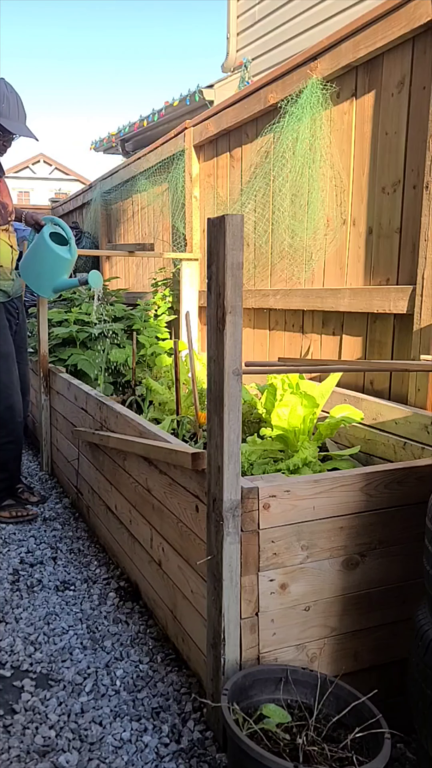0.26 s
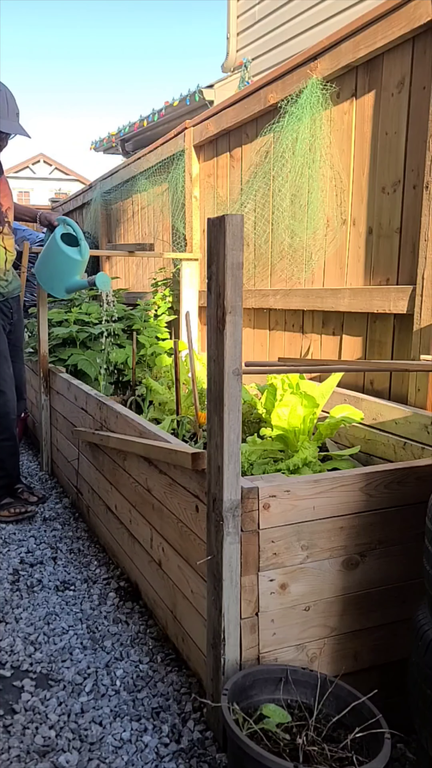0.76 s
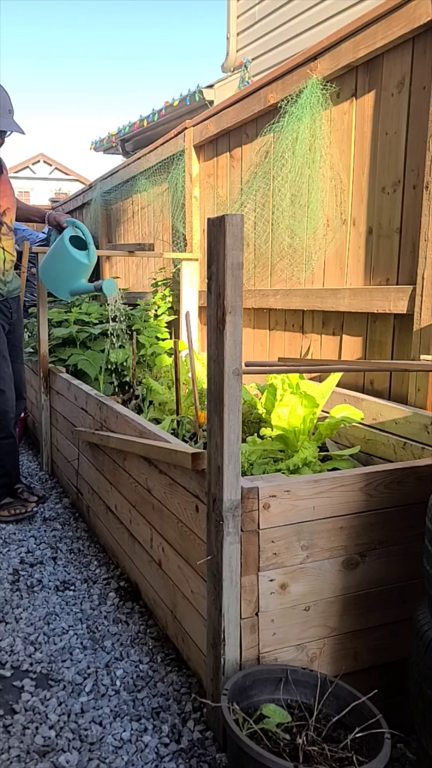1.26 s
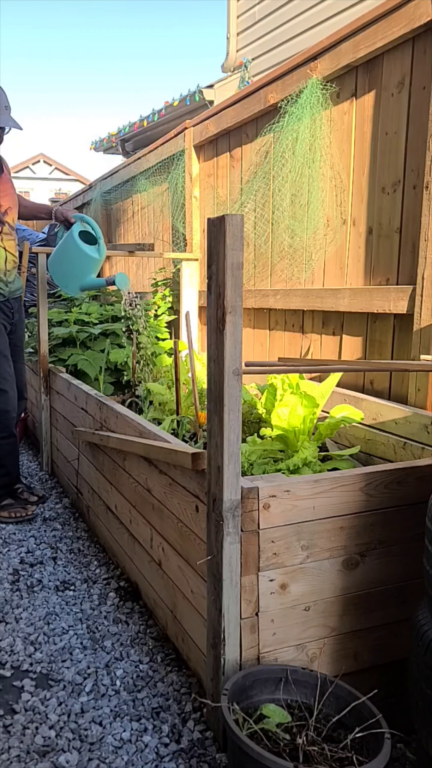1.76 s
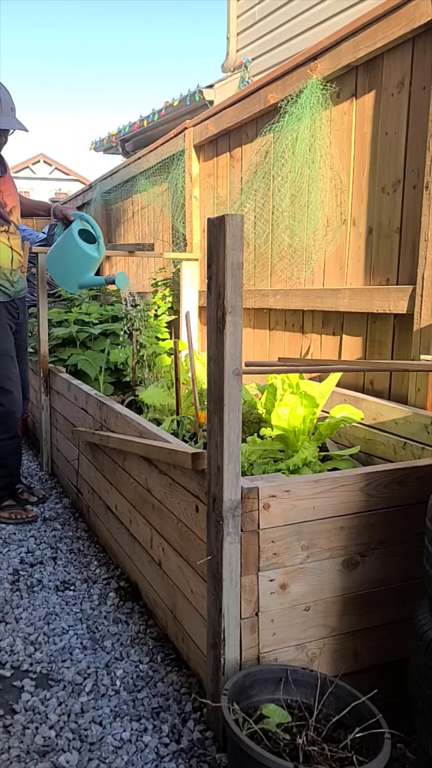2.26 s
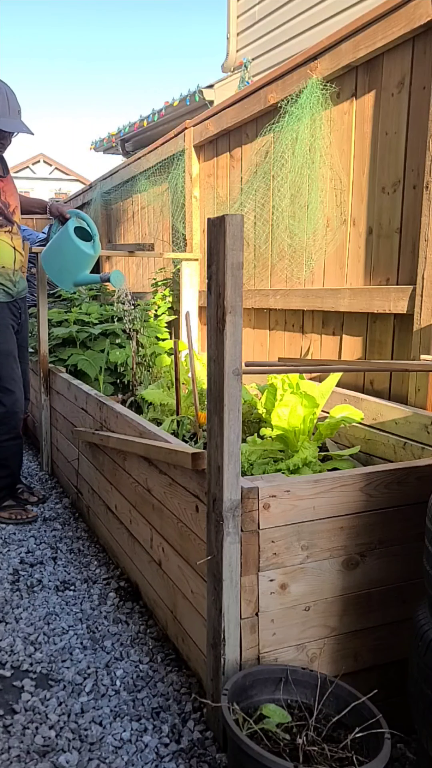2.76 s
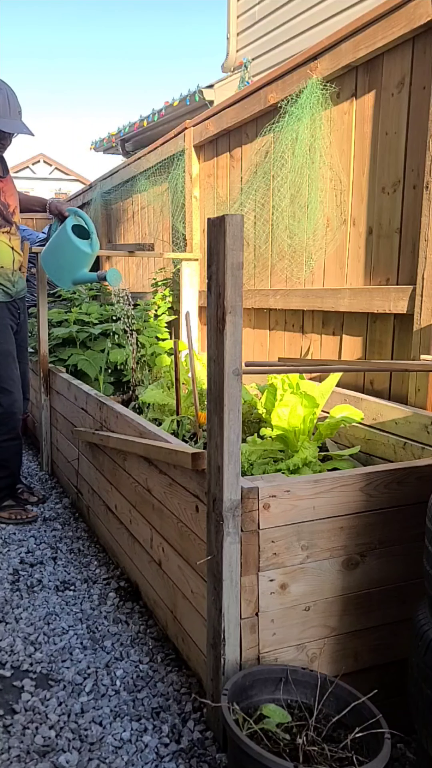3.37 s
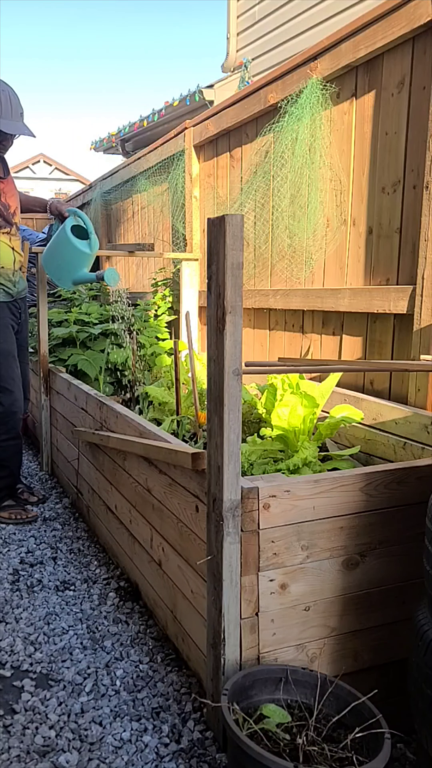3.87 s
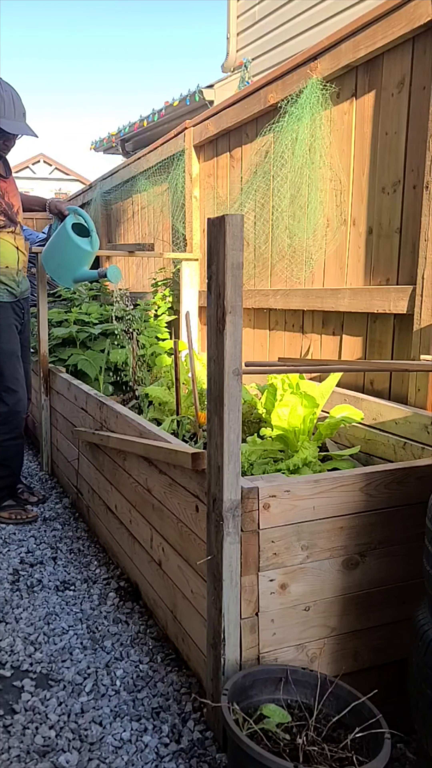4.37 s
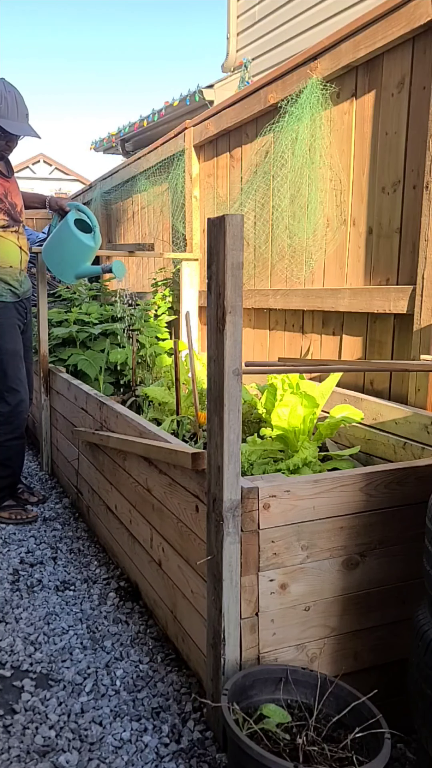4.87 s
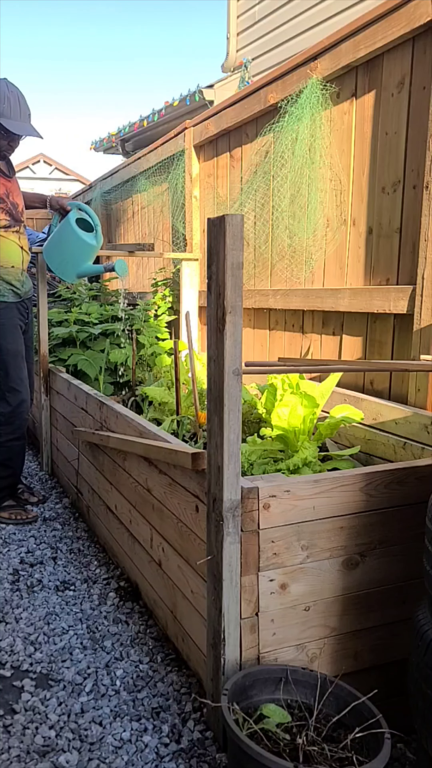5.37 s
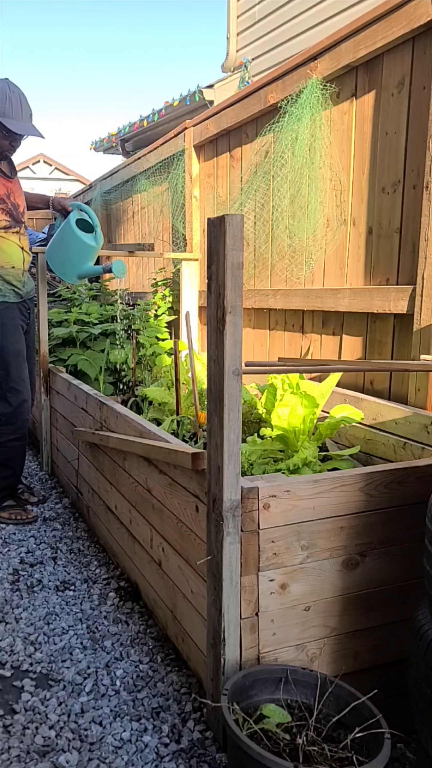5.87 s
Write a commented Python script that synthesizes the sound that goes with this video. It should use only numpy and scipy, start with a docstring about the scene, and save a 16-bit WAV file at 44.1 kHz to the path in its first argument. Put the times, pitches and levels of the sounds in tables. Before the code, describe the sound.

A watering can sprinkles leafy plants in a raised wooden bed outdoors. Fine, bright patter and soft soil splashing continue throughout, swaying between leaves and earth. Fat drops plop at irregular moments with brief bubbly rings, and some smack leaves into fizzy spray. Distant traffic rumbles low behind with a faint engine drone. Stereo microphones sit a few metres away, catching short reflections from boards and fence.

```python
"""Fat drops plop on leaves and wet soil and burst into spray, over a fine patter and the splash of a stream.
A watering can sways over leafy plants in a raised wooden bed, a few metres from two microphones.
Each drop is a short pulse at its own pitch, scattered by bed, gravel and fence; random small drops make
the patter, fizz and splash. Behind, distant traffic of shaped noise with a low hum and an engine drone
rumbles, and one thin whistle passes."""
import sys
import numpy as np
from scipy import signal
from scipy.fft import rfft, irfft
from scipy.io import wavfile

SR = 44100
rng = np.random.default_rng(int(sys.argv[2]) if len(sys.argv) > 2 else 0)


def bounce(signal):
    """Save signal as a 16-bit WAV file at the path given by the first command-line argument."""
    frames = np.transpose(np.atleast_2d(signal))
    limited = np.clip(frames, -1, 1)
    pcm = np.round(limited * 32767).astype(np.int16)
    wavfile.write(sys.argv[1], SR, pcm)


N = 269892
TIME = np.arange(N) / SR  # s
RING = 12288  # samples that one drop and its echoes last

# Every table level is the level ahead of the layer offsets, path and microphone colour in the functions.

# Distant traffic: (time [s], deep rumble level [dB], tyre roar level [dB])
TRAFFIC_LEVELS = [(0, -40.5, -55.5), (.7, -40.5, -57.5), (1.7, -39, -58), (4.25, -38.5, -58),
                  (4.8, -41, -58), (6.12, -39, -57.5)]
# Drone of a far engine: (time [s], pitch [Hz], level [dB])
ENGINE_DRONE = [(0, 312.4, -53), (.3, 314.2, -55), (.45, 329.5, -63.5), (2.1, 330, -61), (3, 322, -77),
                (6.12, 327.6, -63)]
# Spectra of the deep rumble, the engine murmur and the tyre roar: (frequency [Hz], density [dB per Hz])
RUMBLE_SPECTRUM = [(14, -58), (22, -41), (30, -2), (38, -2), (46, -2), (58, -1), (80, -3), (108, -13),
                   (132, -8.5), (165, -13), (215, -25.5), (400, -43.5), (1000, -100)]
MURMUR_SPECTRUM = [(90, -17), (190, 0), (218, -3), (243, 0), (288, -2.5), (318, -3), (350, -9.5),
                   (480, -19.5), (700, -29), (1200, -87)]
ROAD_SPECTRUM = [(300, -11), (520, -7.5), (640, -8.5), (720, -5), (830, -3.5), (980, 1.5), (1130, 0),
                 (1400, -6), (2000, -15.5), (3000, -19), (8000, -28)]
# Likeness of the traffic at the two microphones: (frequency [Hz], likeness [0-1])
MIC_LIKENESS = [(30, .95), (250, .94), (400, .8), (650, .4), (1100, .5), (1600, .25), (3000, .1)]
# How far the left microphone leads on the traffic: (frequency [Hz], phase [rad])
LEFT_LEAD = [(30, 0), (400, 0.22), (700, 0.97), (1150, 1.51), (1700, 0.033), (2200, 1.36)]
# Colour difference of the microphones: (frequency [Hz], left minus right [dB])
MIC_TILT = [(30, 0.2), (400, 0), (1000, 2.5), (1300, 1), (1750, 4), (2500, 0.5), (3300, 0), (4200, -4.5),
            (5600, -1), (7300, -5), (8200, 0), (10500, -1.5), (11500, -4.5), (15500, -2)]
# Pitches that echoes between boards and fence strengthen or weaken:
# (frequency [Hz], width [Hz], lift [dB])
BOARD_ECHOES = [(1680, 35, 0.5), (2040, 55, 5), (2600, 57, -5), (3090, 65, 6), (3290, 140, 3.5),
                (3760, 190, 0), (4200, 140, -1.5), (4540, 47, -10), (5480, 360, 2), (6180, 220, 4),
                (6550, 190, 5), (7300, 690, 6)]
# Where the swaying can is aimed: (time [s], aim [0 = bare soil, 1 = leaves])
CAN_AIM = [(0, 0.41), (.3, 0.27), (.9, 0.41), (1.35, .7), (1.62, 0.59), (1.9, 0.13), (2.3, 0.052),
           (2.75, 0.52), (3.35, 0.32), (3.85, .35), (4.15, 0.88), (4.8, .45), (5.2, 0.87), (5.7, 0.49),
           (6.12, .85)]
# Spectra of the patter on leaves, the spray and the splash on soil: (frequency [Hz], density [dB per Hz])
PATTER_SPECTRUM = [(1500, -14), (2400, -1), (3200, -3.5), (4300, 6), (5500, 0.5), (7300, -1), (8300, 4),
                   (15000, -38)]
SPRAY_SPECTRUM = [(1500, -15), (3500, -7), (7300, -8), (8400, -6), (10300, -4), (11600, -0.5),
                  (14500, -0.5), (16000, -4.5)]
SOIL_SPECTRUM = [(600, -3), (1200, -19.5), (1750, -1.5), (2400, -17), (3500, 10.5), (8000, -33)]
# Water that smacks flat on a leaf and bursts into spray: (time [s], level over the first 20 ms [dB])
LEAF_SMACKS = [(0.181, -56.5), (0.374, -51.5), (0.5811, -49), (0.646, -53), (1.0565, -59), (1.2451, -53),
               (1.4235, -55), (2.2842, -55.5), (2.7462, -52.5), (3.708, -54), (3.9769, -54), (4.572, -55),
               (4.9776, -50.5), (5.2342, -53), (5.312, -49), (5.4904, -51.5), (5.952, -53.5)]
# Fat drops that plop into the wet bed:
# (time [s], level over the first 20 ms [dB], pitch [Hz], bandwidth [octaves])
FAT_DROPS = [(0.017, -56, 5420, 0.16), (0.064, -53.5, 4100, 0.22), (0.3002, -56, 4470, 0.23),
             (0.4673, -46, 3410, 0.28), (0.5811, -54, 4000, 0.15), (0.6455, -49, 1884, 0.22),
             (0.983, -53, 3480, 0.68), (1.0565, -54, 4350, 0.28), (1.3114, -55, 4140, 0.17),
             (1.4247, -48, 4470, 0.54), (1.675, -55.5, 3940, 0.34), (1.736, -43.5, 2150, 0.38),
             (1.7644, -47, 4120, 0.2), (2.5262, -53.5, 4230, 0.53), (2.83, -49.5, 5340, 1),
             (2.979, -53.5, 1830, 0.23), (3.1206, -49, 3490, 0.15), (3.274, -53.5, 2490, 0.6),
             (3.5551, -52, 3700, 0.22), (3.5735, -53, 4240, 0.15), (4.134, -53, 3840, 0.31),
             (4.4239, -52, 3830, 0.3), (4.4798, -57, 3440, 0.29), (4.591, -55, 3450, 0.37),
             (4.7027, -53.5, 3020, 0.33), (5.176, -54, 3650, 0.094), (5.234, -48.5, 3970, 0.28),
             (5.5348, -49.5, 3230, 0.23), (5.6253, -52.5, 3100, 0.4), (5.7758, -48.5, 4115, 0.42),
             (5.8306, -49.5, 3850, 0.15), (5.9068, -46, 3340, 0.22), (5.918, -45.5, 4320, 0.18),
             (5.9515, -51, 2900, 0.38), (6.023, -47.5, 3870, 0.17), (6.073, -52.5, 3080, 0.28)]

# a thin, faint whistle that rises slightly
WHISTLE_S, WHISTLE_LENGTH_S, WHISTLE_DB = 4.6, 0.21, -72
WHISTLE_HZ, WHISTLE_RISE_HZ_PER_S = 8090, 500
# layer levels with the can aimed at soil, and the change on turning to the leaves
PATTER_DB, PATTER_SWING_DB = -67.5, 11
SPRAY_DB, SPRAY_SWING_DB = -68.5, 10
SOIL_DB, SOIL_SWING_DB = -58.5, -7
START_DB, START_S = -8, 1.4  # the splash on the soil builds up as the pour gets going
DROP_SPRAY_DB = -64  # the little spray that every plop throws up
EDGE_HZ = 15850  # upper band limit


def gain_of(db):
    """Decibels to gain."""
    return 10 ** (np.asarray(db) / 20)


def evened(x):
    """Scales to rms 1."""
    return x / np.sqrt(np.mean(x ** 2) + 1e-20)


def read(points, size):
    """A table over frequency, read on a log scale at the bins of a transform."""
    hz, value = np.transpose(points)
    bins_hz = np.fft.rfftfreq(size, 1 / SR)
    return np.interp(np.log(bins_hz + 1), np.log(hz), value)


def follow(rows):
    """The columns of a table over time, at every sample."""
    s, *columns = np.transpose(rows)
    return [np.interp(TIME, s, column) for column in columns]


def colour(x, points):
    """Gives x a spectrum, at rms 1."""
    return evened(irfft(rfft(x) * gain_of(read(points, N)), N))


def wander(per_s):
    """Slow chance of rms 1: noise kept below about per_s Hz."""
    hz = np.fft.rfftfreq(N, 1 / SR)
    slow = rfft(rng.standard_normal(N)) / (1 + (hz / per_s) ** 4)
    return evened(irfft(slow, N))


def add(mix, s, sound):
    """Mixes a sound in at time s."""
    part = mix[:, max(round(s * SR), 0):][:, :sound.shape[1]]
    part += sound[:, :part.shape[1]]


def distant_noise():
    """Noise from far away: alike at both microphones in the bass, less so higher up."""
    left, other = rfft(rng.standard_normal((2, N)))
    same = np.clip(read(MIC_LIKENESS, N), 0, 1)
    right = same * left + np.sqrt(1 - same ** 2) * other
    right = right * np.exp(-1j * read(LEFT_LEAD, N))
    return irfft(np.array([left, right]), N)


def tone(hz, db, waver_hz):
    """A sine of given rms level whose pitch wavers around hz."""
    turns = np.cumsum(hz + waver_hz * wander(per_s=8.0)) / SR
    return gain_of(db) * np.sqrt(2) * np.sin(2 * np.pi * turns)


def traffic(murmur_db=5.0, road_db=3.5, hum_hz=58, hum_db=-50):
    """Lumpy deep rumble with a low hum, murmur and drone of engines, and tyre roar swaying in the air."""
    deep, tyres = follow(TRAFFIC_LEVELS)
    rumble_level = deep + 1.0 * wander(per_s=8.6)
    murmur_level = tyres + murmur_db + 0.91 * wander(per_s=7.5)
    road_level = tyres + road_db + 0.71 * wander(per_s=10.0)
    rumble = gain_of(rumble_level) * colour(distant_noise(), RUMBLE_SPECTRUM)
    murmur = gain_of(murmur_level) * colour(distant_noise(), MURMUR_SPECTRUM)
    road = gain_of(road_level) * colour(distant_noise(), ROAD_SPECTRUM)
    hum_turns = np.cumsum(hum_hz + 1.39 * wander(per_s=3.05)) / SR
    hum = gain_of(hum_db) * evened(np.sin(2 * np.pi * hum_turns))
    drone = tone(*follow(ENGINE_DRONE), waver_hz=2.61)
    return rumble + murmur + road + hum + drone


def whistle():
    """One brief, thin note high above the water: a wavering, rising sine that swells and fades."""
    t = np.clip(TIME - WHISTLE_S, 0, WHISTLE_LENGTH_S)
    swell = np.sin(np.pi * t / WHISTLE_LENGTH_S)
    return swell * tone(WHISTLE_HZ + WHISTLE_RISE_HZ_PER_S * t, WHISTLE_DB, waver_hz=22)


def click(db):
    """Spectrum of the shortest causal pulse with this colour (minimum phase), peaking near gain 1."""
    log_gain = np.log(gain_of(db - db.max()) + 1e-4)
    circle = np.concatenate([log_gain, log_gain[-2:0:-1]])
    return np.exp(np.conj(signal.hilbert(circle)))[:len(db)]


def boards(water, between_db=-0.56):
    """The fixed colour of the path from bed to microphones: boards and fence favour some pitches."""
    f = np.fft.rfftfreq(RING, 1 / SR)
    db = between_db + sum(lift / (1 + (2 * (f - hz) / width) ** 4) for hz, width, lift in BOARD_ECHOES)
    path = irfft(click(db), RING) * gain_of(db.max())
    return signal.oaconvolve(water, path[None], axes=1)[:, :N]


def garden(pulse, scatter_t60, build_s, tail_t60=0.33, tail_db=-9, direct=0.69):
    """One spot of the bed at each microphone: direct sound, scatter off leaves and boards, fence tail."""
    t = np.arange(RING) / SR
    taps = rng.standard_normal((2, RING)) * (rng.random((2, RING)) < .12)  # sparse echoes
    scatter = gain_of(-60 * t / scatter_t60)
    tail = gain_of(tail_db - 60 * t / tail_t60)
    taps *= (1 - np.exp(-t / build_s)) * (scatter + tail)
    taps[:, 0] = direct
    sound = irfft(rfft(taps) * pulse, RING)
    return sound / np.sqrt(np.mean(sound[:, :SR // 50] ** 2))  # rms 1 over the first 20 ms


def plop(hz, octaves):
    """A drop's impact: a few cycles around one pitch, more of them the narrower the band."""
    away = np.log2((np.fft.rfftfreq(RING, 1 / SR) + 1) / hz) / octaves
    return click(-30 * np.log10(1 + away ** 2 / 5))


def shower(per_s, spread_db, lo_hz, hi_hz, octaves, count=16):
    """Small drops of random size tick on many spots, each spot with its own pitch."""
    out = np.zeros((2, N))
    for hz in np.geomspace(lo_hz, hi_hz, count):
        sound = garden(plop(hz, octaves), scatter_t60=.05, build_s=.0006, tail_db=-14, direct=1.5)
        chance, when, size = rng.random((3, 600))
        lands = chance < per_s * (N / SR) / (count * len(chance))  # per_s is shared by all spots
        for s, u in zip(when[lands] * N / SR, size[lands]):
            add(out, s, gain_of(-spread_db * np.log(u + 0.14)) * sound)
    return evened(out)


def drips(db, spray_db, lo_hz, hi_hz, octaves, count=32):
    """Middling drops run off the leaves at uneven intervals, each with its own pitch and some spray."""
    out = np.zeros((2, N))
    burst = click(read(SPRAY_SPECTRUM, RING))
    for k, (when, pitch) in enumerate(rng.random((count, 2))):
        s = (k + when) / count * N / SR
        hz = lo_hz * (hi_hz / lo_hz) ** pitch
        add(out, s, gain_of(db) * garden(plop(hz, octaves), scatter_t60=0.09, build_s=0.00086))
        add(out, s, gain_of(spray_db) * garden(burst, scatter_t60=.12, build_s=0.00076))
    return out


def pour(patter_db=-2.0, bubble_db=-3.5, mist_db=-5):
    """Patter, bubbles, drips and fizzing mist grow as the can turns to leaves; the soil splash recedes."""
    aim, = follow(CAN_AIM)
    leaves = PATTER_DB + PATTER_SWING_DB * aim
    spray = SPRAY_DB + SPRAY_SWING_DB * aim
    soil = SOIL_DB + SOIL_SWING_DB * aim + START_DB * np.maximum(1 - TIME / START_S, 0)
    ticks = shower(per_s=190, spread_db=4.0, lo_hz=2520, hi_hz=7100, octaves=0.13, count=24)
    rings = shower(per_s=130, spread_db=3.3, lo_hz=2200, hi_hz=7000, octaves=.025, count=40)
    specks = shower(per_s=300, spread_db=3.8, lo_hz=6500, hi_hz=15000, octaves=.25)
    slaps = shower(per_s=700, spread_db=2.5, lo_hz=1120, hi_hz=2633, octaves=0.062, count=24)
    patter = gain_of(patter_db) * colour(ticks, PATTER_SPECTRUM)
    bubbles = gain_of(bubble_db) * colour(rings, PATTER_SPECTRUM)
    fizz = colour(specks, SPRAY_SPECTRUM)
    mist = gain_of(mist_db) * colour(rng.standard_normal((2, N)), SPRAY_SPECTRUM)
    splash = colour(slaps, SOIL_SPECTRUM)
    run_off = drips(db=3.5, spray_db=0.5, lo_hz=3300, hi_hz=6700, octaves=.2)
    clumps_db = 1.7 * wander(per_s=20)  # the stream breaks into clumps as it falls
    return (gain_of(leaves + clumps_db) * (patter + bubbles)
            + gain_of(leaves) * run_off
            + gain_of(spray + clumps_db) * (fizz + mist)
            + gain_of(soil) * splash)


def sprays():
    """Bursts of bright spray, each a scattered pulse: from a smack on a leaf, and slight from a plop."""
    out = np.zeros((2, N))
    burst = click(read(SPRAY_SPECTRUM, RING))
    from_plops = [(drop[0], DROP_SPRAY_DB) for drop in FAT_DROPS]
    for s, db in list(LEAF_SMACKS) + from_plops:
        add(out, s, gain_of(db) * garden(burst, scatter_t60=0.1, build_s=0.00066, tail_db=-14.0))
    return out


def fat_drops(bubble_db=-4, scatter_t60=0.15, fence_s=.033, fence_db=-13):
    """Each drop plops and traps a bubble ringing briefly at the same pitch; the fence returns the plop."""
    out = np.zeros((2, N))
    for s, db, hz, octaves in FAT_DROPS:
        pulse = plop(hz, octaves)
        ring = plop(hz, octaves / 6)  # narrower band, so it rings longer
        impact = garden(pulse, scatter_t60, build_s=0.00094, tail_db=-11.5, direct=2.3)
        echo = garden(pulse, scatter_t60, build_s=0.0034)
        bubble = garden(ring, scatter_t60=0.058, build_s=0.00062, tail_db=-9.5)
        add(out, s, gain_of(db) * impact)
        add(out, s + fence_s, gain_of(db + fence_db) * echo)
        add(out, s, gain_of(db + bubble_db) * bubble)
    return out


def scene():
    """Traffic and whistle behind, water in front."""
    water = pour() + sprays() + fat_drops()
    return traffic() + whistle() + boards(water)


def record(dry):
    """Each microphone has its own colour; then the band limit."""
    tilt_db = np.outer([.5, -.5], read(MIC_TILT, N))  # half the difference to each side
    heard = irfft(rfft(dry) * gain_of(tilt_db), N)
    band = signal.firwin(511, EDGE_HZ, window=("kaiser", 9), fs=SR)
    return signal.oaconvolve(heard, band[None], "same")


dry = scene()
out = record(dry)
bounce(out)
```